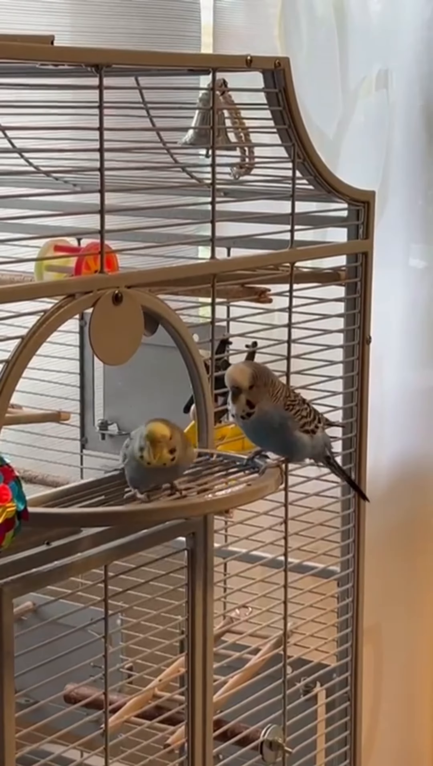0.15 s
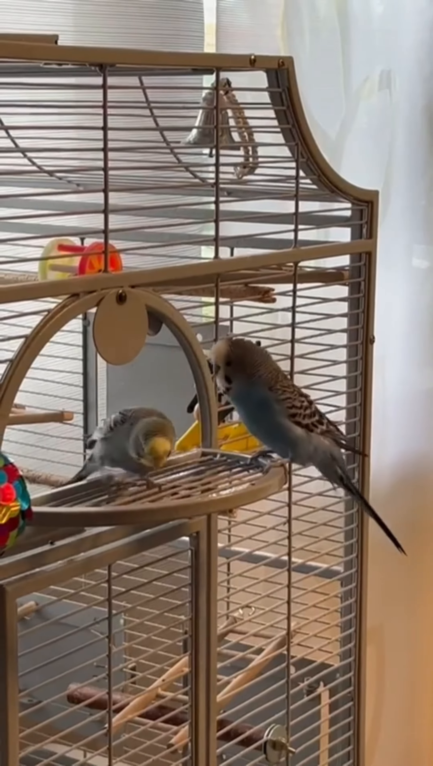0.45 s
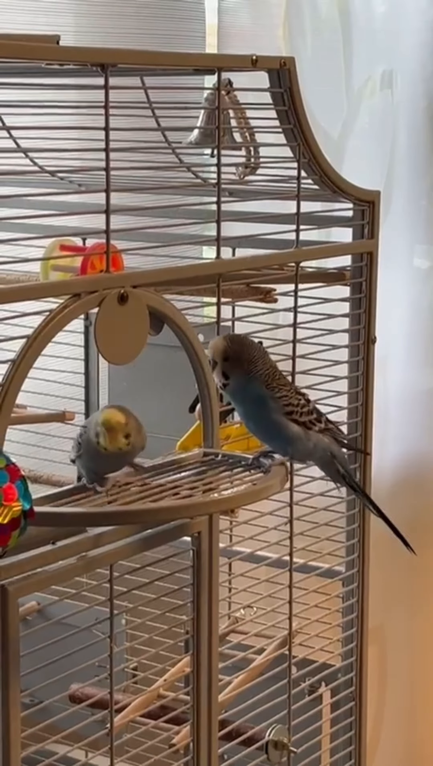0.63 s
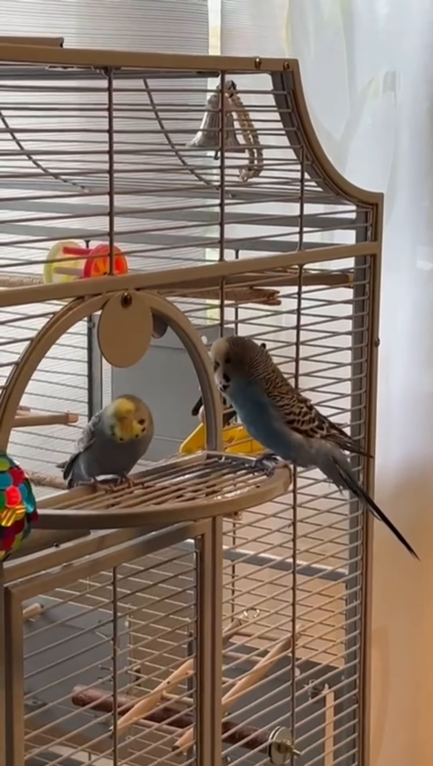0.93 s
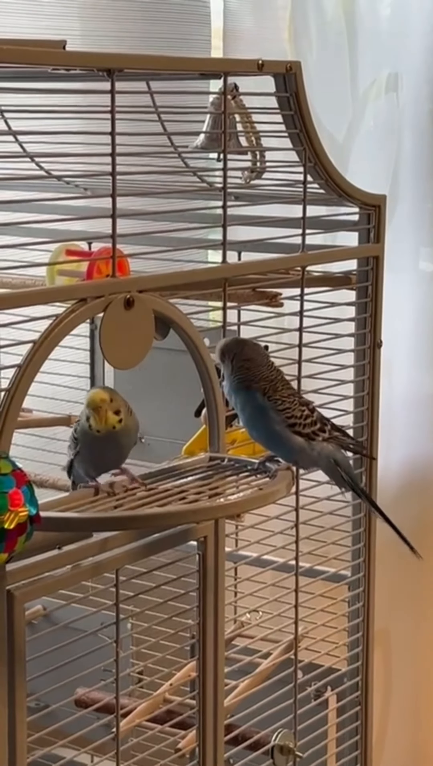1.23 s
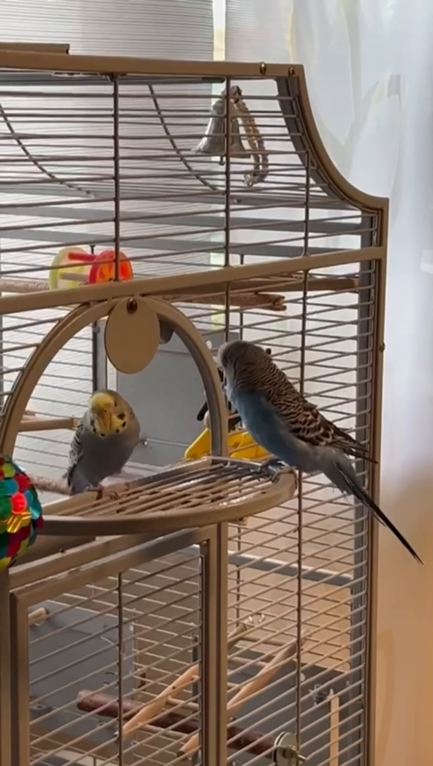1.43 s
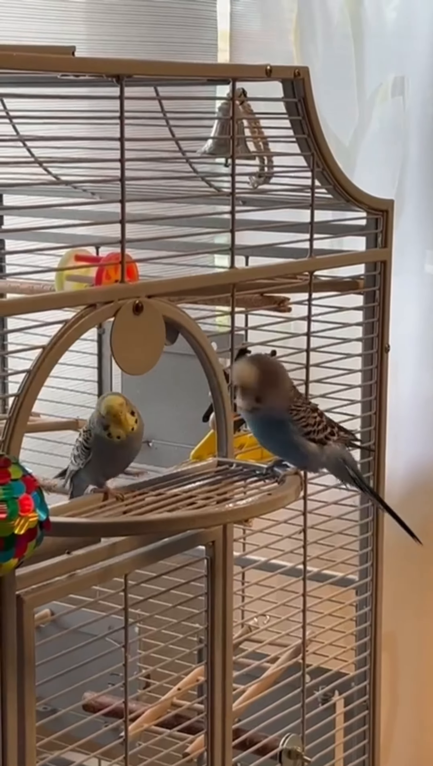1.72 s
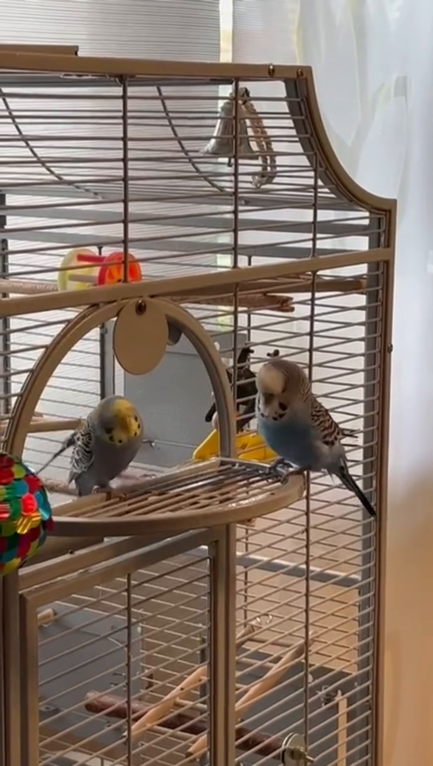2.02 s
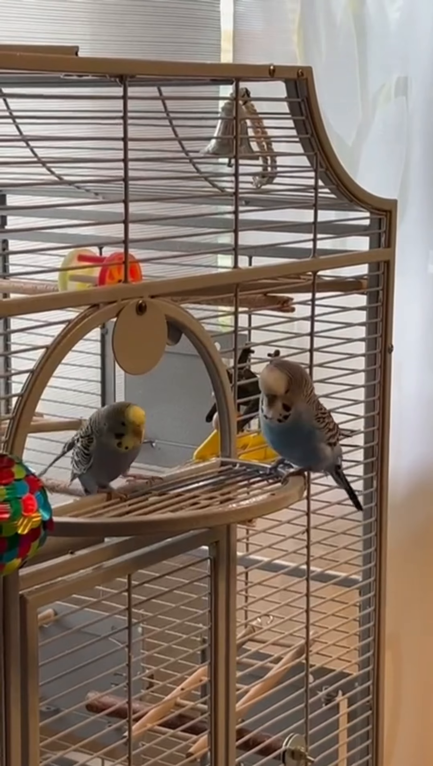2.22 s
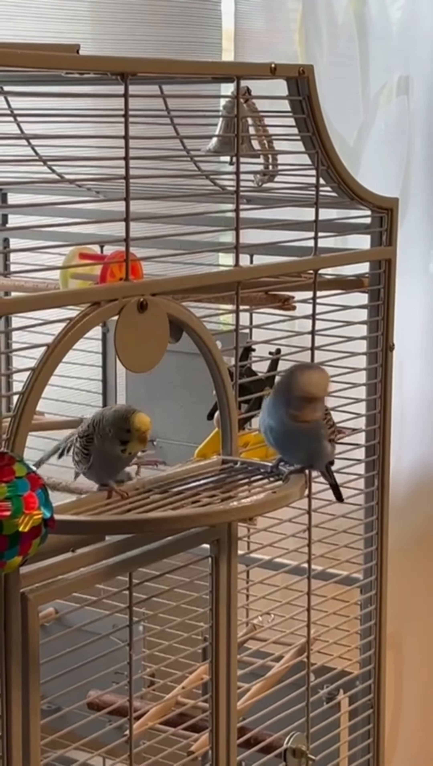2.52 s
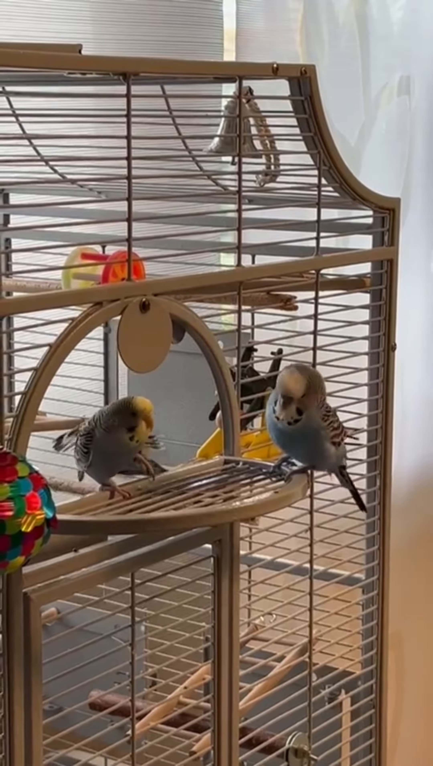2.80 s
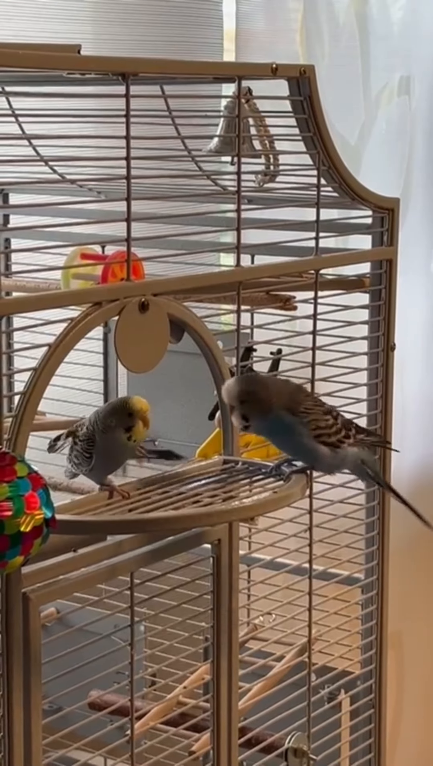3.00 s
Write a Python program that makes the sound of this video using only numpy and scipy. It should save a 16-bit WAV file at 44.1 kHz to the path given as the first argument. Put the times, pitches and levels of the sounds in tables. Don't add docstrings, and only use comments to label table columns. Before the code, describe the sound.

Two parakeets chatter at a cage indoors, close to a phone: clicks and whistles first, a loud cluster at half a second, then scattered raspy squeaks, a sharp snap past two seconds, and softer chirps.

```python
import sys
import numpy as np
from scipy import signal
from scipy.fft import rfft, irfft, next_fast_len
from scipy.io import wavfile
from scipy.ndimage import uniform_filter1d, minimum_filter1d

SR = 44100
rng = np.random.default_rng(int(sys.argv[2]) if len(sys.argv) > 2 else 0)


def waveform_to_disk(signal):
    frames = np.transpose(np.atleast_2d(signal))
    scaled = np.clip(frames, -1, 1) * 32767
    samples = np.round(scaled).astype(np.int16)
    wavfile.write(sys.argv[1], SR, samples)


def invert_db(x):
    u = np.asarray(x, float) / 20
    return 10 ** u


N = 138915
LEAD_IN = 8820
TOP_HZ = 12250


def evened(x):
    return x / np.sqrt(np.mean(x ** 2) + 1e-20)


def read(points, hz):
    f, value = np.transpose(points)
    return np.interp(np.log(hz + 1), np.log(f + 1), value)


def add(mix, start_s, sound):
    part = mix[LEAD_IN + round(start_s * SR):][:len(sound)]
    part += sound[:len(part)]


def resonate(x, hz, width_hz):
    turn = np.exp(2j * np.pi * np.cumsum(hz * np.ones(len(x))) / SR)
    r = np.exp(-np.pi * width_hz / SR)
    shifted = x / turn
    return 2 * (turn * signal.lfilter([(1 - r) ** 2], [1, -2 * r, r * r], shifted)).real


def drift(size, count):
    smooth = uniform_filter1d(rng.standard_normal(4096), count)
    return evened(uniform_filter1d(smooth, count))[:size]


def arch(t, length):
    return np.sqrt(np.abs(np.sin(np.pi * (t / length) ** 0.83)))


# (frequency [Hz], level per Hz [dB])
HOUSE_AIR = [(20, -14.5), (50, 1.5), (150, -4.5), (300, -7), (600, -14.5), (2000, -14), (9000, -41.5)]
# (frequency [Hz], likeness [0-1])
AIR_LIKENESS = [(30, .1), (600, 0.13)]


def hush():
    hz = np.fft.rfftfreq(N, 1 / SR)
    a, b = rfft(rng.standard_normal((2, N)))
    same = np.clip(read(AIR_LIKENESS, hz), 0, 1)
    second = same * a + np.sqrt(1 - same ** 2) * b
    pair = np.array([a, second]) * invert_db(read(HOUSE_AIR, hz))
    return invert_db(-54.5) * evened(irfft(pair, N))


PUFF_HZ, PUFF_FADE_S, STEADY_AIR = 177.7, 0.0036, 0.1
THROAT_WIDTH = 0.65
BEAK_HZ, BEAK_WIDTH_HZ, BEAK_SAG = 8950, 2400, 0.24
CHEST_RATIO, CHEST_DB = 0.605, -19
# (start [s], length [s], level [dB], throat pitch [Hz], treble [dB])
RASPS = [(-.12, 0.072, -33.5, 2650, -11.5), (0.109, 0.0056, -31, 3250, -6.5),
         (0.114, 0.0083, -25, 3000, -8), (0.515, 0.044, -25, 4200, -6), (0.604, 0.035, -24, 3180, -10),
         (0.758, 0.043, -29.5, 3080, -13), (0.92, 0.02, -23.5, 2680, -6.5), (1.083, 0.18, -33.5, 3670, -3),
         (1.23, 0.021, -30, 2940, -16), (1.274, 0.028, -27.5, 3770, -34), (1.391, 0.084, -40.5, 3570, 0.5),
         (1.562, 0.051, -31.5, 3900, -8), (1.744, 0.023, -34.5, 2540, -24), (2.05, 0.086, -44.5, 2680, -7),
         (2.231, 0.033, -26.5, 4070, 3), (2.2414, 0.039, -15.5, 3900, -3),
         (2.526, 0.058, -23.5, 3630, -7.5), (2.694, 0.055, -24.5, 3540, -16),
         (2.737, 0.089, -32, 3700, -19.5), (3.043, 0.043, -47, 3770, -4), (0.251, 0.074, -44.5, 4640, -6),
         (2.262, 0.02, -23.5, 2600, 8)]


def rasp(start, length, level_db, throat_hz, treble_db):
    t = np.arange(4096) / SR
    turns = np.cumsum(PUFF_HZ * (1 + .1 * drift(4096, count=200))) / SR
    opening = STEADY_AIR + np.exp(-(turns % 1) / PUFF_HZ / PUFF_FADE_S)
    puffs = opening * rng.standard_normal(4096)
    throat = evened(resonate(puffs, throat_hz, THROAT_WIDTH * throat_hz))
    chest = evened(resonate(puffs, CHEST_RATIO * throat_hz, 580))
    beak_hz = BEAK_HZ * (1 - BEAK_SAG * np.minimum(t / length, 1))
    beak = evened(resonate(puffs, beak_hz, BEAK_WIDTH_HZ))
    sound = throat + invert_db(CHEST_DB) * chest + invert_db(treble_db) * beak
    swell = arch(np.minimum(t, length), length) ** 2.12 * (t < length)
    return start, invert_db(level_db) * swell * sound


# (start [s], length [s], level [dB], first pitch [Hz], last pitch [Hz])
STROKES = [(0.1057, 0.0017, -35, 7100, 6540), (0.114, 0.0054, -32.5, 7300, 6660),
           (0.309, 0.0039, -18, 3090, 2990), (0.334, 0.0058, -16.5, 2190, 2067),
           (0.505, 0.018, -31.5, 4610, 4990), (0.524, 0.00684, -19.5, 2160, 1385),
           (0.526, 0.012, -17.5, 3800, 3250), (0.531, 0.013, -26, 1374, 1870),
           (0.572, 0.0026, -4, 3000, 2500), (0.596, 0.0195, -20, 1850, 2100),
           (0.614, 0.0227, -19, 2370, 1730), (0.9364, 0.0045, -14.5, 2680, 2400),
           (1.13, 0.027, -25.5, 6710, 6350), (1.154, 0.0077, -21.5, 2200, 2200),
           (1.289, 0.0074, -21, 1510, 1590), (1.406, 0.0175, -40, 3600, 3920),
           (1.419, 0.027, -50, 7700, 7400), (1.434, 0.033, -31.5, 3700, 3530),
           (1.3, 0.0057, -23.5, 1984, 1908), (1.8, 0.0047, -38, 2020, 2100),
           (1.579, 0.0257, -25.5, 3520, 3200), (1.766, 0.017, -45.5, 7300, 8160),
           (1.775, 0.0085, -22.5, 1950, 2076), (1.813, 0.014, -45, 6650, 6210),
           (2.6, .016, -42, 2700, 3430), (2.072, 0.0063, -31, 1490, 2250), (2.09, 0.021, -29.5, 2900, 3050),
           (2.115, 0.0076, -23, 2730, 1580), (2.118, .012, -32, 3020, 3360),
           (2.2528, 0.0049, -10.5, 3540, 3660), (2.2575, 0.0059, -28, 8900, 11000),
           (2.27, 0.0037, -4.5, 6560, 4700), (2.697, .01, -27, 3100, 3850),
           (2.753, 0.0075, -24, 4360, 3600), (2.787, 0.0065, -22.5, 4000, 3400),
           (2.802, 0.016, -30, 2710, 2960), (2.979, 0.0054, -29, 2200, 2400),
           (3.055, 0.02, -33, 6370, 6020), (3.072, 0.0218, -36.5, 3640, 4340)]


def stroke(start, length, level_db, from_hz, to_hz):
    t = np.arange(0, length, 1 / SR)
    phase = 2 * np.pi * np.cumsum(from_hz + (to_hz - from_hz) * t / length) / SR
    tone = np.sin(phase) + invert_db(-42) * np.sin(2 * phase)
    return start, invert_db(level_db) * np.sin(np.pi * t / length) * tone


# (time [s], level [dB], ring pitch [Hz])
CLICKS = [
    (0.108, -15.5, 2460),
    (0.117, -20.5, 2780),
    (.493, -14.5, 2340),
    (0.5661, -8.5, 3000),
    (1.731, -27, 1790),
    (1.746, -24, 1830),
    (2.243, -26, 4400),
    (2.981, -36, 2300),
]


def click(time, level_db, ring_hz):
    t = np.arange(200) / SR
    ring = np.sin(2 * np.pi * ring_hz * t) + 0.08 * np.sin(2 * np.pi * 7500 * t)
    return time - .0006, invert_db(level_db) * ring * (t / 0.00032) * np.exp(1 - t / 0.00033)


# (time [s], level [dB], thud pitch [Hz])
THUDS = [
    (.108, -38.5, 963),
    (1.55, -52.5, 334),
    (1.743, -52.5, 199),
    (2.262, -31, 826),
    (2.54, -45.5, 197),
]


def thud(time, level_db, thud_hz):
    t = np.arange(2600) / SR
    knock = evened(resonate(rng.standard_normal(2600), thud_hz, 150))
    return time, invert_db(level_db) * knock * (t / 0.0031) * np.exp(1 - t / 0.0044)


THROB_HZ, BREATH_DB = 170, -24


def note(start, length, level_db, from_hz, to_hz, wobble, depth, tones):
    t = np.arange(0, min(length, .09), 1 / SR)
    hz = from_hz + (to_hz - from_hz) * t / length
    phase = 2 * np.pi * np.cumsum(hz * (1 + wobble * drift(len(t), count=50))) / SR
    tone = evened(sum(invert_db(tones(k, hz)) * np.sin(k * phase) for k in range(1, 9)))
    throb_turns = np.cumsum(THROB_HZ * (1 + 0.469 * drift(len(t), count=300))) / SR
    throb = 1 + depth * np.sin(2 * np.pi * (rng.random() + throb_turns))
    leak = evened(resonate(rng.standard_normal(4096), 2770, 3100))[:len(t)]
    return start, invert_db(level_db) * arch(t, length) * (throb * tone + invert_db(BREATH_DB) * leak)


# (frequency [Hz], level [dB])
SQUEAK_THROAT = [(900, 1.5), (1350, 2), (1800, -0.5), (2600, 3.5), (3600, -2), (4800, -17), (6600, -7),
                 (11000, -24.5)]
# (start [s], length [s], level [dB], first pitch [Hz], last pitch [Hz])
SQUEAKS = [(0.247, 0.016, -39, 1990, 2007), (1.091, 0.038, -35.5, 1190, 2130),
           (1.127, 0.022, -24.5, 2250, 2143), (1.149, 0.013, -21.5, 2219, 2205),
           (1.24, 0.038, -32.5, 843, 1494), (1.279, 0.028, -23, 1488, 1680),
           (1.411, 0.023, -30.5, 1667, 1997), (1.43, 0.033, -26.5, 1793, 1796),
           (1.46, 0.02, -29.5, 1912, 1477), (1.56, 0.015, -32, 1998, 2104),
           (1.576, 0.036, -28.5, 1726, 1493), (1.745, 0.022, -34.5, 1046, 1381),
           (2.713, 0.013, -25, 1183, 1617), (2.553, 0.0097, -31.5, 1117, 890),
           (2.695, 0.0095, -32.5, 1850, 1800), (2.706, 0.045, -37.5, 1402, 1245),
           (3.064, 0.035, -46, 1950, 2070)]


def squeak(*row):
    def tones(k, hz):
        return read(SQUEAK_THROAT, k * hz) - 99 * (k * hz > TOP_HZ)
    return note(*row, wobble=0.043, depth=0.69, tones=tones)


WHISTLE_TONES_DB = [5, -20, -15, -22]
# (start [s], length [s], level [dB], first pitch [Hz], last pitch [Hz])
WHISTLES = [(0.282, 0.041, -27, 2970, 2420), (0.3, 0.029, -29.5, 2986, 3084),
            (0.321, 0.016, -24.5, 2300, 1958), (1.769, 0.023, -34, 1380, 2206),
            (0.495, 0.017, -13.5, 2713, 3335), (0.507, 0.015, -16.5, 2504, 2275),
            (0.529, 0.021, -14.5, 3010, 2589), (0.546, 0.024, -15.5, 2812, 3340),
            (0.572, 0.032, -23.5, 3005, 3065), (0.613, 0.0063, -13.5, 2847, 2896),
            (0.616, 0.026, -29, 2286, 741), (0.768, 0.022, -36, 2745, 3350),
            (0.789, 0.0044, -24.5, 3115, 2480), (0.791, 0.039, -27.5, 2160, 1646),
            (0.925, 0.015, -16.5, 3840, 2153), (0.938, 0.032, -30.5, 1488, 1956),
            (1.813, 0.017, -35.5, 2213, 1980), (2.065, 0.04, -32.5, 2635, 2353),
            (2.117, 0.014, -30.5, 1425, 2118), (2.932, 0.025, -29, 3040, 2740),
            (2.951, 0.022, -25.5, 3130, 3324), (1.15, 0.015, -25, 3304, 3260),
            (2.984, 0.0057, -36, 3500, 3090), (3.02, 0.055, -37, 2306, 2160)]


def whistle(*row):
    def tones(k, hz):
        return WHISTLE_TONES_DB[k - 1] if k < 5 else -99
    return note(*row, wobble=.022, depth=.5, tones=tones)


CALL_SAG, PULSE_DIP = 0.039, .09
CHURR_TONES_DB = [-1, 4, 3, -16, -29, -30]
# (start [s], length [s], level [dB], pitch [Hz], pulses per second [1/s])
CHURRS = [
    (2.5259, 0.0513, -23.5, 1443, 178),
    (2.717, 0.0694, -29, 1300, 120),
]


def churr(start, length, level_db, pitch_hz, rate):
    t = np.arange(0, length, 1 / SR)
    cycle = t * rate % 1
    hz = pitch_hz * (1 + CALL_SAG * (.5 - t / length) + PULSE_DIP * (.5 - cycle))
    phase = 2 * np.pi * np.cumsum(hz) / SR
    tone = evened(sum(invert_db(db) * np.sin((k + 1) * phase) for k, db in enumerate(CHURR_TONES_DB)))
    pulses = evened(np.minimum(cycle / 0.15, 1) * np.exp(-2.5 * cycle))
    return start, invert_db(level_db) * arch(t, length) ** 2 * pulses * tone


def birds():
    mix = np.zeros(N + LEAD_IN)
    for maker, table in ((rasp, RASPS), (click, CLICKS)):
        for row in table:
            add(mix, *maker(*row))
    mix = signal.sosfilt(signal.butter(6, 1047, "high", fs=SR, output="sos"), mix)
    others = ((stroke, STROKES), (thud, THUDS), (squeak, SQUEAKS), (whistle, WHISTLES), (churr, CHURRS))
    for maker, table in others:
        for row in table:
            add(mix, *maker(*row))
    return mix


# (frequency [Hz], time to fall 60 dB [s])
ROOM = [(300, 0.43), (1300, 0.46), (3500, 0.49), (10000, 0.26)]


def room(x):
    taps = np.zeros((3, SR))
    at = np.arange(120, SR - 20, 20) + rng.integers(0, 20, (3, (SR - 121) // 20))
    np.put_along_axis(taps, at, rng.choice([-1., 1.], at.shape), 1)
    hz, t, z = signal.stft(taps, SR, nperseg=256)
    fade = invert_db(-60 * t / read(ROOM, hz)[:, None])
    tail = signal.istft(z * fade, SR, nperseg=256)[1]
    return signal.fftconvolve(x[None], tail / np.linalg.norm(tail[0]), axes=1)[:, :len(x)]


# (frequency [Hz], level [dB])
OWN_TAIL = [(500, 2), (1300, 0.1), (2500, -5), (5500, -8)]


def scene():
    dry = birds()
    wet = invert_db(-4.5) * room(dry)
    own_level = invert_db(read(OWN_TAIL, np.fft.rfftfreq(len(dry), 1 / SR)))
    own = irfft(rfft(wet[1:]) * own_level, len(dry))
    return (dry + wet[0] + own)[:, LEAD_IN:] + hush()


# (frequency [Hz], phase [rad])
LEAD = [(100, 0.24), (350, 0.86), (800, 2), (1500, 0.01), (2500, 1.964), (4100, 0.6),
        (4850, 1.3), (5150, 3.1), (6100, 3.2), (7000, 6.1), (8000, 6.5), (9500, 9.35), (10900, 9.5),
             (11600, 12.5)]
# (frequency [Hz], level [dB])
COLOUR = [(1000, -0.58), (5000, 2), (5400, 5), (9100, -4), (9700, -4), (10700, 2), (11400, -1.5),
          (12200, -25.5)]


def two_sides(dry):
    size = next_fast_len(N + 4096)
    hz = np.fft.rfftfreq(size, 1 / SR)
    lead = read(LEAD, hz) / 2
    colour = invert_db(read(COLOUR, hz) - 60 * np.clip((hz - TOP_HZ) / 100, 0, 1))
    return irfft(rfft(dry, size) * colour * np.exp(1j * np.array([lead, -lead])), size)[:, :N]


MASK_DB, MASK_UP_DB, MASK_DOWN_DB = -19, 1.7, 4.5
NULL_DB = 7


def thinned(x):
    mid_side = np.array([x[0] + x[1], x[0] - x[1]]) / 2
    z = signal.stft(mid_side, nperseg=2048, noverlap=1536)[2]
    power = (abs(z[:, :1024]) ** 2).reshape(2, 64, 16, -1).mean(axis=2)
    power = uniform_filter1d(power, size=3, axis=2)
    level_db = 10 * np.log10(abs(power) + 1e-20)
    band = np.arange(64)
    above = band[:, None] - band
    spread_db = np.maximum(MASK_UP_DB * above, -MASK_DOWN_DB * above)
    masker_db = (level_db.max(axis=0)[None] - spread_db[:, :, None]).max(axis=1)
    level_db[0, 15:18] -= NULL_DB
    keep = np.clip((level_db - masker_db - MASK_DB) / 2, 0, 1)
    keep[:, :4] = 1
    z[:, :1024] *= np.repeat(keep, 16, axis=1)
    mid, side = signal.istft(z, nperseg=2048, noverlap=1536)[1][:, :N]
    return np.array([mid + side, mid - side])


def limited(x):
    top = -minimum_filter1d(-abs(x).max(axis=0), size=301)
    return x * uniform_filter1d(np.minimum(.93 / (top + 1e-9), 1), size=151)


def band_limit(x):
    return signal.sosfilt(signal.butter(12, 12250, fs=SR, output="sos"), x)


def record(dry):
    mix = limited(thinned(two_sides(dry)))
    return band_limit(mix)


dry = scene()
out = record(dry)
waveform_to_disk(out)
```